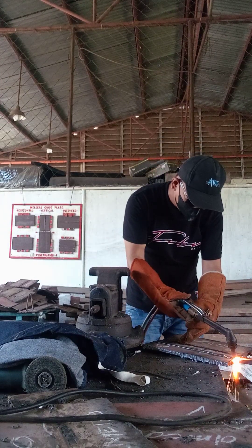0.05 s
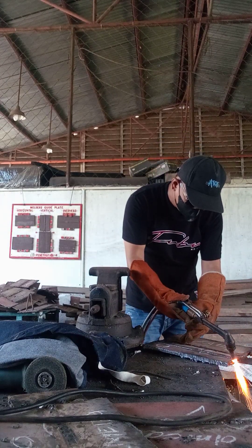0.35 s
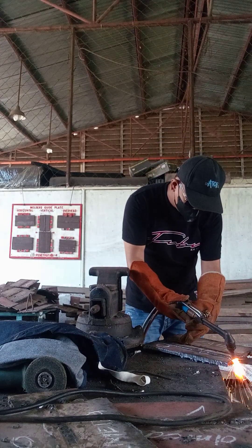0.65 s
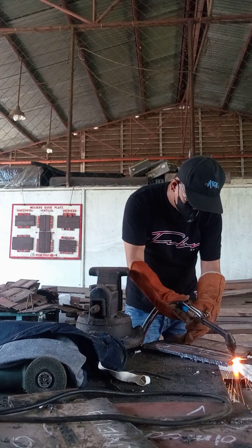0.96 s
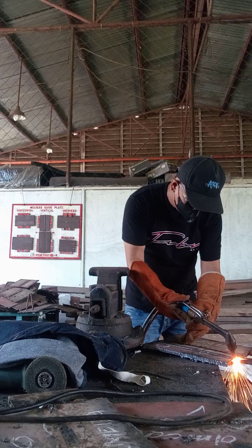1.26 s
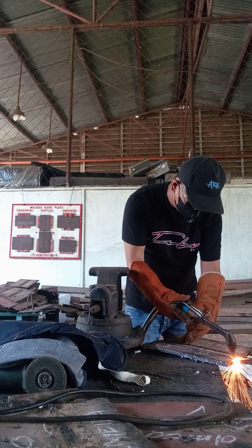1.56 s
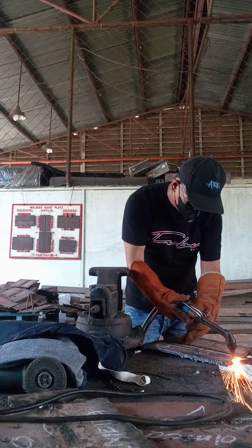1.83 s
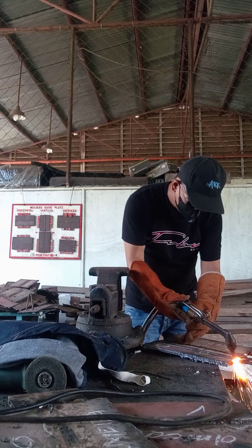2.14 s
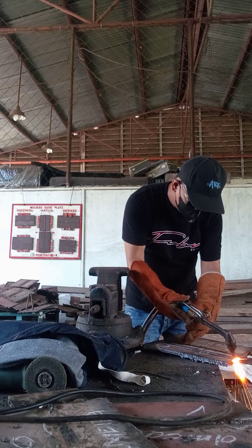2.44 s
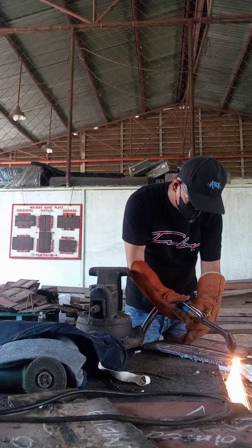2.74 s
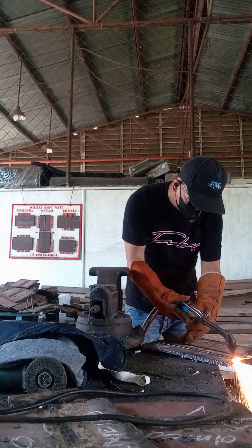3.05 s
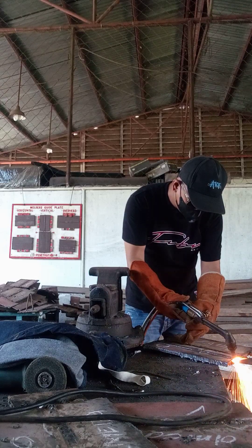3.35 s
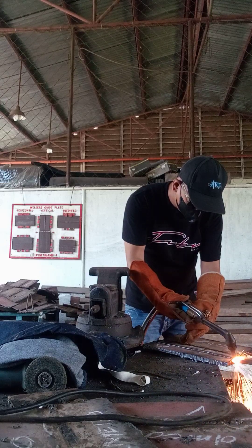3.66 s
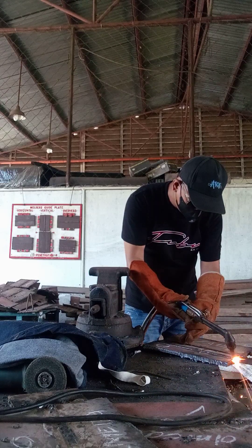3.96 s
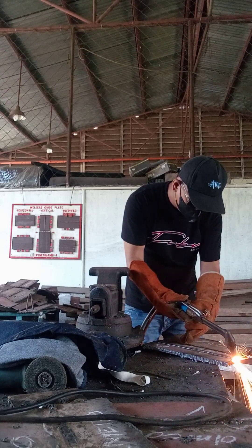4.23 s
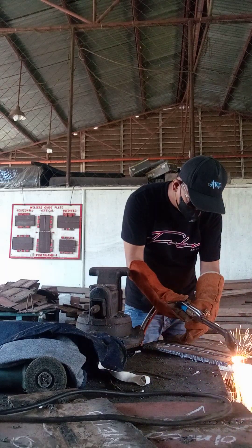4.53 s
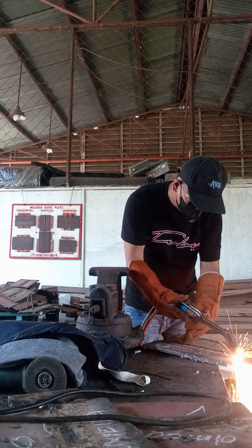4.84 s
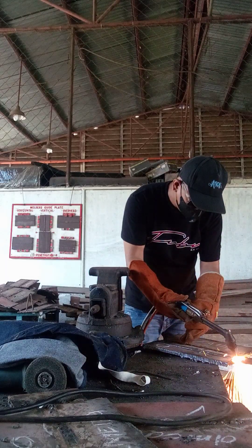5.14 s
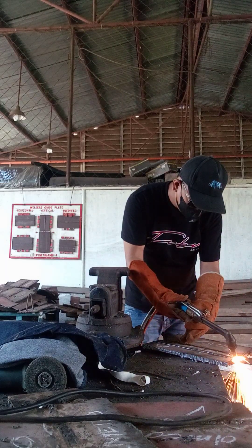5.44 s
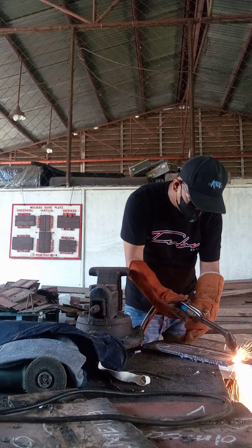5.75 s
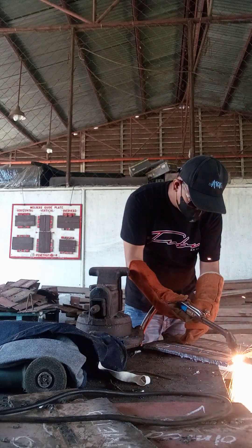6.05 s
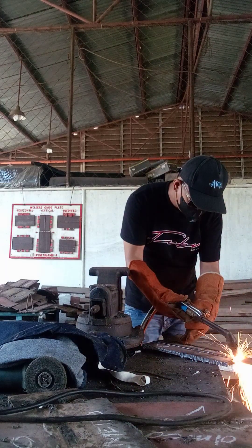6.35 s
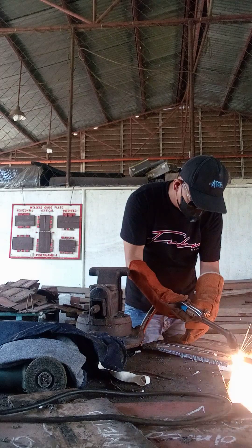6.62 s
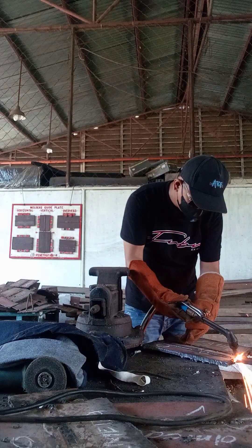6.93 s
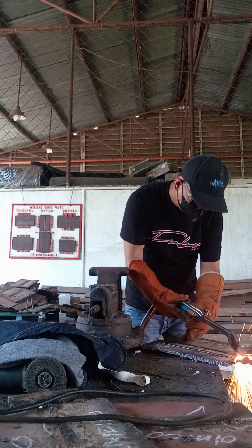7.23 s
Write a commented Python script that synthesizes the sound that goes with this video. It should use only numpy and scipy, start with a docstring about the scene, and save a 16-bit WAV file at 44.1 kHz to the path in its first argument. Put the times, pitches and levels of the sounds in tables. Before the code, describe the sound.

A gas torch flame hisses against a steel plate from the start, flaring with a slightly hollow roar at about 0.3 to 0.6 seconds, then wavering at a softer level. Around 2.7 seconds the cutting jet opens, adding a louder, brighter hiss and a rush that continue to the end, strongest near 4.7 seconds. Brief breathy whistles come at about 2.9 and 4.2 seconds, with fainter ones later. From 3.6 seconds molten slag sputters and crackles irregularly. Sharp pops cluster around 4.5 and 5 seconds, with a couple near 5.6 and more at 6.2. The loudest pop lands near 6.9 seconds, the hiss dips briefly, and a last pop comes at about 7.3. The torch sounds close, with a short, bright echo from the workshop and a faint low rumble underneath throughout.

```python
"""Gas torch cutting steel

A torch works a plate on a bench in a large tin-roofed workshop, over the low rumble of the hall.
The preheat flame hisses and flares against the plate edge, ringing hollow. Then the cutting oxygen
opens: the jet hisses, rushes through the kerf and now and then whistles across it.
Molten slag sputters and pops as it is blown out, and roof and walls throw the torch back as echoes."""
import sys
import numpy as np
from scipy import signal
from scipy.fft import rfft, irfft
from scipy.io import wavfile
from scipy.ndimage import uniform_filter1d

SR = 44100
rng = np.random.default_rng(int(sys.argv[2]) if len(sys.argv) > 2 else 0)


def pcm_store(signal):
    """Save signal as 16-bit PCM."""
    levels = np.round(np.clip(np.atleast_2d(signal), -1, 1) * 32767)
    wavfile.write(sys.argv[1], SR, levels.astype(np.int16).T)


N = 325899
TIME = np.arange(N) / SR
PIERCED_S = 3.15  # the jet breaks through the plate

# how hard the preheat flame strikes the plate: (time [s], relative level [dB])
FLAME_ENVELOPE = [(0, -32.5), (0.24, -35.5), (0.35, -23.5), (0.51, -25), (0.66, -32.5), (0.74, -30),
                  (0.98, -31.5), (1.18, -36), (1.31, -32), (1.44, -39), (1.78, -36), (1.96, -31.5),
                  (2.03, -36.5), (2.21, -32.5), (2.5, -30), (2.67, -29.5), (2.93, -29.5), (3.1, -36.5)]
# loudness of the oxygen hiss, dipping briefly after the loudest pop: (time [s], relative level [dB])
OXYGEN_ENVELOPE = [(2.95, -27), (3.07, -27), (3.23, -23), (3.55, -23), (3.88, -25), (4.65, -20.5),
                   (5.0, -21.5), (5.38, -23), (6.0, -25), (6.21, -26), (6.33, -24), (6.82, -24),
                   (6.9, -27.5), (7.28, -24), (7.39, -28.5)]
# breathy whistles across the kerf: (middle [s], length [s], pitch [Hz], level [dB])
WHISTLE_CUES = [(2.9, 0.3, 2370, -29.5), (4.153, 0.32, 2500, -26), (4.52, 0.4, 4190, -35),
                (5.75, 0.65, 2700, -36), (6.45, 0.6, 3330, -32), (6.767, 0.22, 3870, -32),
                (7.166, 0.098, 2440, -31)]
# sputters of slag blown out of the kerf: (start [s], hold [s], relative level [dB])
SPUTTER_CUES = [(3.624, 0.058, -32), (3.83, 0.032, -27.5), (4.184, 0.037, -29.5), (4.436, 0.046, -27.5),
                (4.47, 0.17, -26.5), (4.952, 0.021, -25), (4.987, 0.095, -22), (5.426, 0.029, -26),
                (5.507, 0.04, -33.5), (5.615, 0.028, -27), (5.695, 0.03, -25.5), (5.915, 0.11, -30),
                (6.152, 0.031, -25.5), (6.212, 0.102, -22.5), (6.324, 0.035, -27), (6.746, 0.079, -28),
                (6.882, 0.025, -21), (6.95, 0.03, -27), (7.335, 0.023, -25)]
# single bursts of slag: (time [s], relative peak [dB], thump amount [0-1])
POP_CUES = [(3.639, -16, 0.03), (3.683, -18, 0), (3.836, -22, .05), (4.474, -4, 0), (4.484, -9, 0),
            (4.531, -8, 0.03), (4.541, -9, 0.2), (4.567, -6.5, 0), (4.614, -2.5, 0), (4.975, -3.5, 0),
            (4.977, -4, 0.25), (4.994, -8, 0.1), (5.005, -7.5, 0.24), (5.016, -5, 0), (5.037, -13, 0.2),
            (5.07, -14, 0), (5.076, -13, 0.2), (5.619, -11.5, 0.3), (5.706, -11, 0), (6.214, -10, 0.1),
            (6.270, -14, 0.5), (6.297, -11, 0.15), (6.304, -7, 0.1), (6.806, -14, 0.2), (6.871, -1, 0.18),
            (6.894, -11, 0.3), (6.904, -8.5, 0), (6.980, -12, 0.06), (7.345, -10.5, 0)]

# broad tone of each layer: (frequency [Hz], gain [dB])
FLAME_EQ = [(100, -14), (300, -9), (500, -5.5), (1000, -3), (1600, 5), (2500, 2), (3500, -2.5), (4500, -12),
            (6000, -23.5), (9000, -31), (15000, -48)]
NOZZLE_EQ = [(500, -20.5), (1500, -3), (2500, -2), (3500, -3), (4500, -10.5), (6000, -26), (9000, -23),
             (12000, -21), (15000, -17.5)]
HALL_EQ = [(10, -50), (33, -26), (48, -1), (70, 1), (125, 0), (180, -7.5), (240, 0.5), (320, -6),
           (600, -9.5), (2000, -12.5), (15000, -52)]
JET_EQ = [(1500, -26.5), (4000, 7.5), (5500, -2), (7000, -0.5), (9000, 1), (12000, -1), (14000, 0.5),
          (15500, 0.5)]
KERF_EQ = [(200, -23.5), (500, -22.5), (1000, -10.5), (1600, -1.5), (2400, 1), (3500, 3), (4400, -5.5),
           (5500, -17.5), (8000, -22), (15000, -40)]
SLAG_EQ = [(40, -32), (90, -18.5), (180, 3.5), (300, 1), (500, -1), (1000, 3), (1700, 3), (2600, 7),
           (3600, -4.5), (5000, -25), (12000, -25)]
POP_EQ = [(50, -27), (120, -22), (400, -12.5), (1000, 6), (1800, 12), (2700, 5.5), (3600, 6.5), (5000, -28),
          (12000, -38)]

# resonances and notches of plate, bench and walls: (centre [Hz], width [Hz], gain [dB])
BENCH_MODES = [(126, 73, 8.5), (173, 13, -7), (379, 110, 10.5), (474, 120, 10.5), (567, 39, 6),
               (630, 70, 5.5), (714, 155, 8.5), (748, 93, -2.5), (927, 78, 4), (965, 340, 5.5),
               (1046.6, 34, 6), (1216, 250, 2.5), (1359, 50, 3), (1386, 30, 4), (1519, 22, 3),
               (1700, 38, -9), (1715, 27, 4.5), (1902, 555, -6), (2012, 350, 5.5), (2362, 190, 3.5),
               (2636, 130, 4), (3253, 770, -5.5), (3365, 95, 5.5), (4240, 430, -1.5), (5200, 160, 3.8),
               (6160, 300, 4), (7660, 2970, 8.5), (9020, 2040, -5.5), (12300, 940, -2), (13770, 2300, 5)]
# own resonances of the flame, the hall and a pop in the kerf: (centre [Hz], width [Hz], gain [dB])
FLAME_MODES = [(1020, 380, 0.5), (454, 73, -3.5), (2370, 140, 2), (3040, 1000, -0.5), (3510, 190, 2.5),
               (5330, 900, -7)]
HALL_MODES = [(45.7, 10, 5), (88, 13, 2), (128, 4.3, 3.5), (137, 8.7, 11.2)]
POP_MODES = [(1030, 950, 1.6)]
# hollow under the plate, rung by the larger sputters: (centre [Hz], width [Hz], gain [dB])
HOLLOW_MODES = [(122, 20, -17), (383.5, 70, -13.5)]
# reverb tail of the workshop: (frequency [Hz], time to fall 60 dB [s])
HALL_T60 = [(100, 0.3), (1000, 0.5), (4000, 0.64), (15000, 0.61)]


def from_db(db):
    """Decibels to gain."""
    return 10 ** (np.asarray(db) / 20)


def unit(x):
    """Scales to rms 1."""
    return x / np.sqrt(np.mean(x ** 2) + 1e-20)


def over_hz(points, hz):
    """Reads a curve on a log-frequency axis."""
    f, value = np.transpose(points)
    return np.interp(np.log(hz + 1), np.log(f + 1), value)


def over_time(points):
    """Draws an envelope through its breakpoints."""
    return np.interp(TIME, *np.transpose(points))


def wander(rate_hz):
    """Smooth random motion up to about the given rate, rms 1."""
    hz = np.fft.rfftfreq(N, 1 / SR)
    return unit(irfft(rfft(rng.standard_normal(N)) * (hz > 2) / (1 + (hz / rate_hz) ** 2), N))


def response(eq, modes, size=16384):
    """Minimum-phase impulse response of a broad EQ curve with resonances on it."""
    hz = np.fft.rfftfreq(size, 1 / SR)
    db = over_hz(eq, hz)
    for centre, width, height in modes:
        db = db + height / (1 + (2 * (hz - centre) / width) ** 2) ** 2
    cepstrum = irfft(np.log(from_db(db)))
    cepstrum[1:size // 2] *= 2
    cepstrum[size // 2 + 1:] = 0
    return irfft(np.exp(rfft(cepstrum)))[:size // 2]


def radiate(drive, eq, modes=BENCH_MODES):
    """Colours a drive signal with an EQ curve and resonances; rms 1."""
    return unit(signal.oaconvolve(drive, response(eq, modes))[:N])


def resonate(x, hz, width_hz):
    """A steep band-pass resonance; rms 1."""
    band = signal.butter(2, [hz - width_hz / 2, hz + width_hz / 2], "bandpass", fs=SR, output="sos")
    return unit(signal.sosfilt(band, x))


def turbulence(flutter_db, flutter_hz, eddy_db, eddy_width_hz):
    """Gas noise whose strength flutters as a whole, while eddies favour one band or another."""
    noise = rng.standard_normal(N) * from_db(flutter_db * wander(flutter_hz))
    bands = signal.stft(noise, nperseg=512)[2]
    eddy_bins = max(1, int(eddy_width_hz * 2 * len(bands) / SR))
    eddies = uniform_filter1d(rng.standard_normal(bands.shape), size=14, axis=1)  # smooth in time
    eddies = unit(uniform_filter1d(eddies, size=eddy_bins, axis=0))
    return signal.istft(bands * from_db(eddy_db * eddies), nperseg=512)[1][:N]


def flame(trim_db=-0.5, duck_db=-3, usual_db=-32, flare_db=-22, heating_db_per_s=1.24):
    """The preheat flame roars as it strikes the plate, and rings hollow as it flares."""
    strike_db = over_time(FLAME_ENVELOPE)
    cutting = np.interp(TIME, [PIERCED_S - .15, PIERCED_S + .1], [0, 1])
    level_db = strike_db + duck_db * cutting  # the flame passes into the open cut
    gas = turbulence(flutter_db=0.7, flutter_hz=50, eddy_db=2, eddy_width_hz=500)
    roar = radiate(gas, FLAME_EQ, [*BENCH_MODES, *FLAME_MODES])
    body = signal.sosfiltfilt(signal.butter(2, 1600, fs=SR, output="sos"), roar)
    treble_db = -0.5 - 0.19 * (strike_db - usual_db)  # the top end swells less than the body
    treble = (roar - body) * from_db(treble_db)
    heating_db = heating_db_per_s * TIME * (1 - cutting)  # the ring firms up until the plate is pierced
    ring_db = -8 + 0.24 * (level_db - flare_db) + heating_db
    ring = resonate(rng.standard_normal(N), hz=985, width_hz=190) * from_db(ring_db)
    return (body + treble + ring) * from_db(level_db + trim_db)


def nozzle_hiss(level_db=-41):
    """The preheat jets leave the nozzle in a constant bed of hiss."""
    gas = turbulence(flutter_db=2, flutter_hz=28, eddy_db=1.96, eddy_width_hz=700)
    return radiate(gas, NOZZLE_EQ) * from_db(level_db)


def hall_rumble(level_db=-45):
    """Room tone: the hall rumbles low, droning at a few pitches."""
    return from_db(level_db) * radiate(rng.standard_normal(N), HALL_EQ, HALL_MODES)


def hall_echoes(x, predelay_s=0.012):
    """Dense reflections from roof and walls: a bright tail, the bass dying first."""
    taps = rng.standard_normal(SR) * (np.arange(SR) / SR > predelay_s)
    hz, t, bands = signal.stft(taps, SR, nperseg=256)
    decay = from_db(-60 * t / over_hz(HALL_T60, hz)[:, None])
    tail = signal.istft(bands * decay, SR, nperseg=256)[1]
    return signal.oaconvolve(x, tail / np.linalg.norm(tail))[:N]


def oxygen_jet(boil, valve_at_s=2.718, opening_s=0.18, attack_s=0.04, jet_db=-1.5, kerf_db=-9.5):
    """The valve opens: a bright jet, and a lower rush that grows where it scours slag from the kerf."""
    age = TIME - valve_at_s
    valve_db = -19.5 * np.clip(1 - age / opening_s, 0, 1)
    hiss_db = over_time(OXYGEN_ENVELOPE) + valve_db
    slag_load = uniform_filter1d(boil, int(0.17 * SR))
    scour_db = 4.5 * slag_load / (slag_load + from_db(-22.5))  # the lift levels off under heavy slag
    deepening_db = 0.32 * age  # the rush builds as the cut deepens
    rush_db = kerf_db + 0.6 * hiss_db + deepening_db + scour_db
    jet = radiate(turbulence(flutter_db=0.57, flutter_hz=80, eddy_db=1.1, eddy_width_hz=900), JET_EQ)
    rush = radiate(turbulence(flutter_db=0.84, flutter_hz=50, eddy_db=0.26, eddy_width_hz=500), KERF_EQ)
    attack = np.clip(age / attack_s, 0, 1)
    return attack * (jet * from_db(hiss_db + jet_db) + rush * from_db(rush_db))


def kerf_whistles(width_hz=300):
    """Now and then the jet sounds the slot it has cut, in one smooth, breathy swell."""
    out = np.zeros(N)
    for middle, length, hz, db in WHISTLE_CUES:
        span = abs(TIME - middle) < length / 2
        swell = np.cos(np.pi * (TIME[span] - middle) / length)
        out[span] += from_db(db) * swell * resonate(rng.standard_normal(N)[span], hz, width_hz)
    return out


def boil_envelope(simmer_db=-40, sway_db=2, attack_s=0.0053, release_s=0.0077):
    """Once the plate is pierced the melt simmers unevenly, and sputters each rise, hold and fade."""
    boil = from_db(simmer_db + sway_db * wander(rate_hz=12)) * (TIME > PIERCED_S)
    for start, hold, db in SPUTTER_CUES:
        age = TIME - start
        attack = np.clip(age / attack_s, 0, 1)
        release = np.exp(-np.maximum(age - hold, 0) / release_s)
        boil = np.maximum(boil, from_db(db) * attack * release)
    return boil


def spatter(per_s, spread_db):
    """Random clicks, most small and a few large; rms 1."""
    size = from_db(spread_db * np.minimum(rng.exponential(1, N), 3))
    return unit(size * rng.choice([-1, 1], N) * (rng.random(N) < per_s / SR))


def slag_sputter(boil, trim_db=1.5, clump_db=2, big_sputter_db=-22.5, hollow_growth=1.57):
    """Molten metal tears off in clumps of tiny bursts; big sputters ring the hollow under the plate."""
    bursts = spatter(per_s=1500, spread_db=2.5) * from_db(clump_db * wander(rate_hz=104))
    crackle = radiate(bursts, SLAG_EQ) * boil
    hollow = sum(from_db(db) * resonate(bursts, hz, width) for hz, width, db in HOLLOW_MODES)
    big = from_db(big_sputter_db)
    hollow_gain = big * (boil / big) ** hollow_growth
    return from_db(trim_db) * (crackle + hollow * hollow_gain)


def slag_pops(trim_db=2, spray_gain=0.035, spray_s=0.008, thump_db=-3, thump_hz=118, thump_s=0.0073):
    """Each pop is a sharp blow and a short spray of droplets; the big gobs also push out a low thump."""
    t = np.arange(SR // 10) / SR
    ring = response(POP_EQ, [*BENCH_MODES, *POP_MODES])
    ring /= abs(ring).max()
    thump_envelope = t / thump_s * np.exp(-t / thump_s)
    thump = from_db(thump_db) * np.sin(2 * np.pi * thump_hz * t) * thump_envelope
    out = np.zeros(N + len(t))
    for start, peak_db, thump_amount in POP_CUES:
        burst = spray_gain * rng.standard_normal(len(t)) * np.exp(-t / spray_s)
        burst[0] = 1  # the blow itself
        crack = signal.oaconvolve(burst, ring)[:len(t)]
        out[round(start * SR):][:len(t)] += from_db(peak_db + trim_db) * (crack + thump_amount * thump)
    return out[:N]


def scene(echo_db=-9):
    """The torch, its echoes and the room tone, alike in both channels."""
    boil = boil_envelope()  # drives both the sputter and the rush in the kerf
    preheat = flame() + nozzle_hiss()
    torch = preheat + oxygen_jet(boil) + kerf_whistles() + slag_sputter(boil) + slag_pops()
    mono = torch + from_db(echo_db) * hall_echoes(torch) + hall_rumble()
    return np.array([mono, mono])


def record(dry, low_cut_hz=42, ceiling=0.95, high_cut_hz=15560):
    """The microphone drops the deepest bass and rounds off the loudest pops; a steep high cut follows."""
    thinned = signal.sosfilt(signal.butter(4, low_cut_hz, "highpass", fs=SR, output="sos"), dry)
    rounded = thinned / (1 + (thinned / ceiling) ** 6) ** (1 / 6)
    high_cut = signal.firwin(1023, high_cut_hz, window=("kaiser", 9), fs=SR)
    return signal.oaconvolve(rounded, high_cut[None], "same")


dry = scene()
out = record(dry)
pcm_store(out)
```